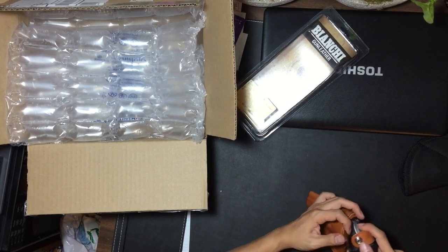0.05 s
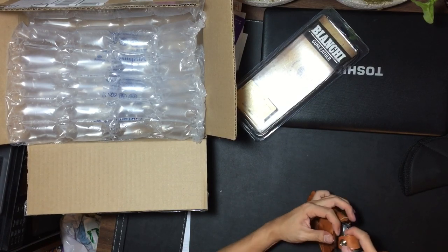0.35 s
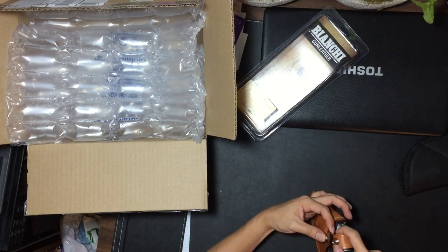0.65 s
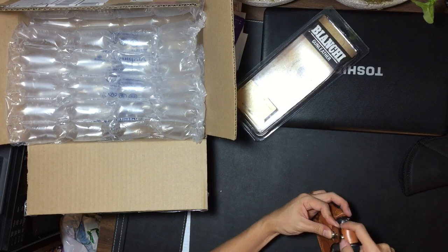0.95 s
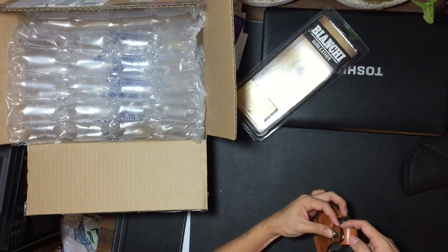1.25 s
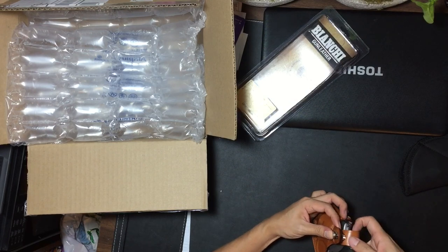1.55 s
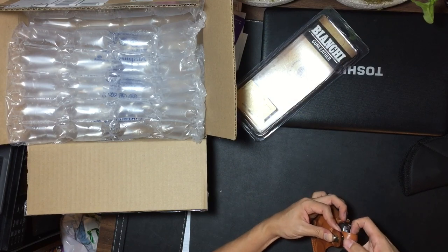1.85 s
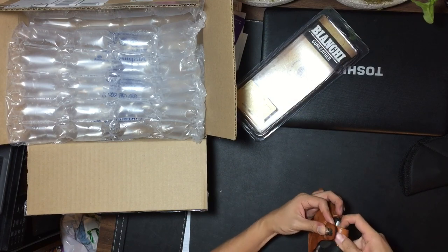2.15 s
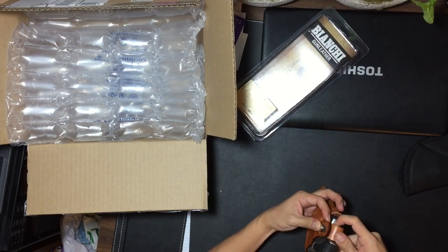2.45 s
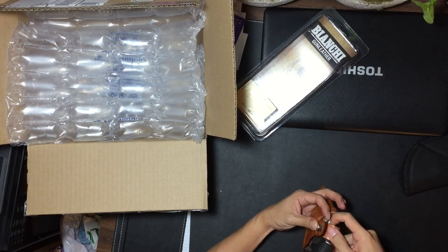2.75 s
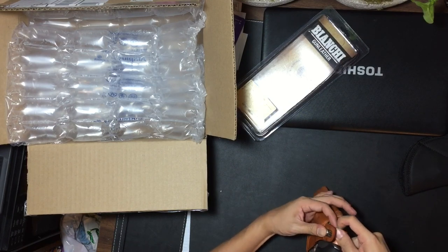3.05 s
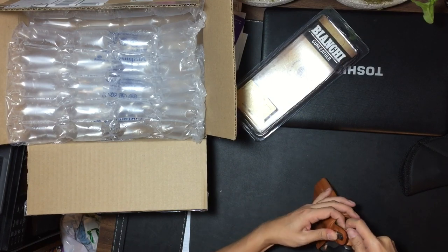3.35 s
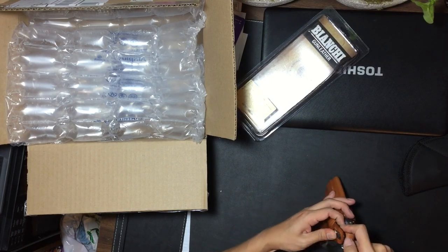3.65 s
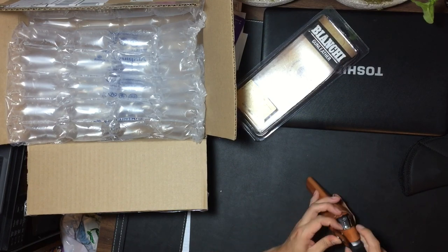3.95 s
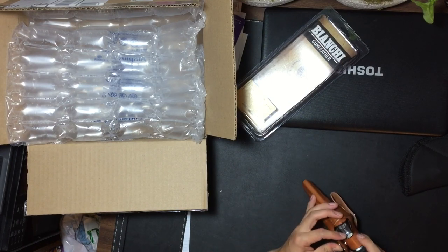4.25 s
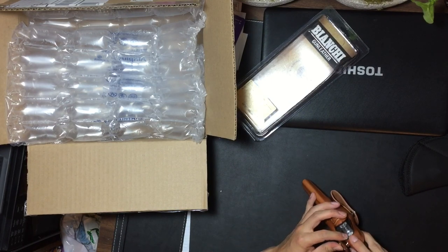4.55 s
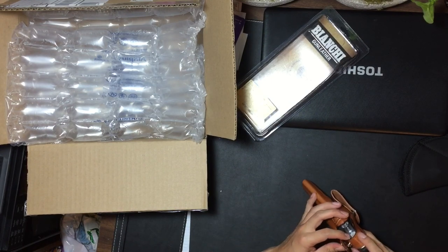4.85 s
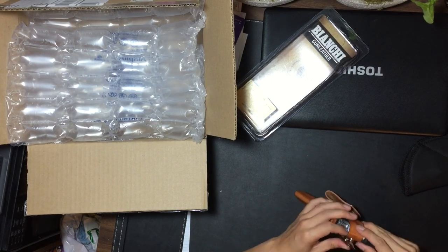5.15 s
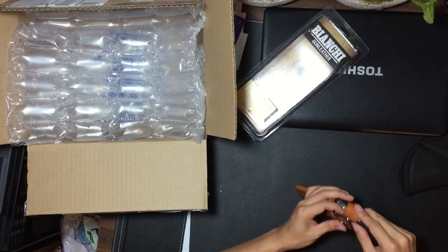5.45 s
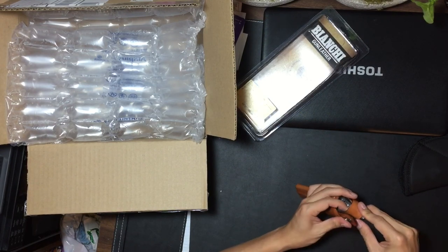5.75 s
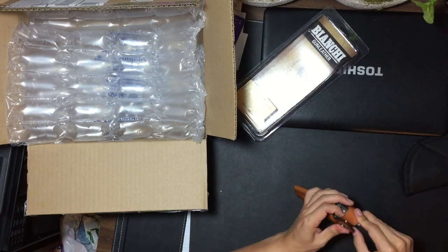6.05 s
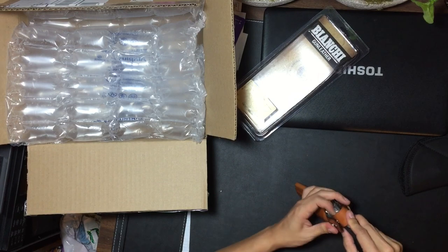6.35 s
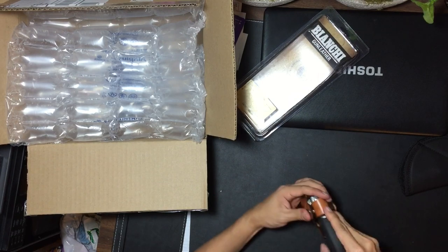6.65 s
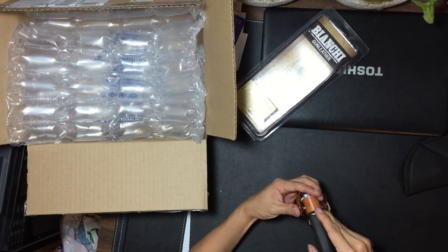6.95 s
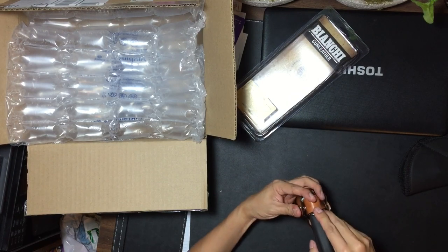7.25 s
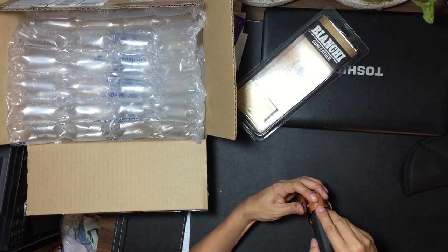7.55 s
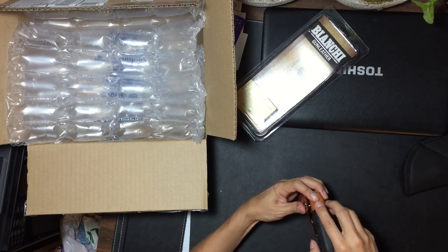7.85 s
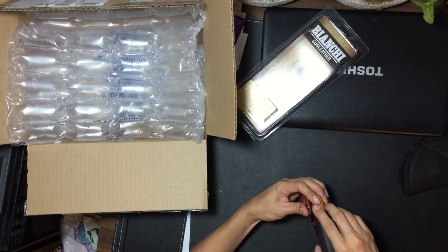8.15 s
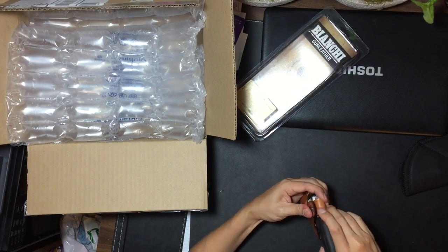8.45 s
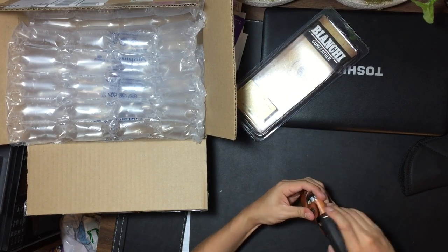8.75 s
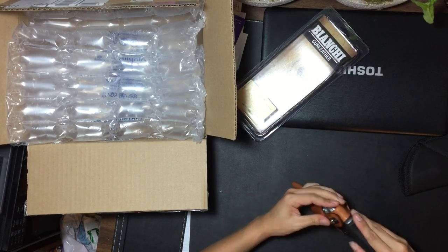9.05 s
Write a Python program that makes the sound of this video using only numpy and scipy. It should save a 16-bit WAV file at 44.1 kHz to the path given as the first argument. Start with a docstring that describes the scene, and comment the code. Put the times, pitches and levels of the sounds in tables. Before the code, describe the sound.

A revolver is worked into a stiff leather holster with small creaks, ticks and scuffs, then a press stud snaps shut.

```python
"""A revolver is worked into a stiff leather holster over a desk in a small, quiet room.
First hands rub and bump softly and the leather gives a few ticks. From about 3 s it sticks and slips
on the steel in creaking runs, each slip exciting the holster's resonances; at 4.4 s the gun scuffs
along the seam. From 7 s the strap is stretched, steel skids over the rim of its press stud, and at
8.7 s the stud snaps shut, jolting the holster in the hands."""
import sys
import numpy as np
from scipy import signal
from scipy.fft import rfft, irfft
from scipy.io import wavfile
from scipy.ndimage import uniform_filter1d

SR = 44100
rng = np.random.default_rng(int(sys.argv[2]) if len(sys.argv) > 2 else 0)


def master_out(mix):
    """Clip the mix to full scale and print it as 16-bit PCM to the path in sys.argv[1]."""
    frames = np.transpose(np.atleast_2d(mix))
    ceiling = np.clip(frames, -1, 1)
    pcm = np.round(ceiling * 32767).astype(np.int16)
    wavfile.write(sys.argv[1], SR, pcm)


N = 409688
SIZE, LEAD_S = 4096, 0.006  # samples in one contact sound; time allowed for creep before a slip


def amp(db):
    """Decibels to amplitude ratio."""
    return 10 ** (np.asarray(db) / 20)


def unit(x):
    """Normalisation to rms 1."""
    return x / np.sqrt(np.mean(x ** 2) + 1e-20)


def fade(t, t60):
    """Exponential decay, 60 dB in t60 seconds."""
    return np.exp(-np.log(1000) * t / t60)


def along(points, hz):
    """Interpolation of (frequency [Hz], value) points on a logarithmic frequency axis."""
    f, v = np.transpose(points)
    return np.interp(np.log(hz + 1), np.log(f + 1), v)


def add(track, s, sound):
    """Superposition of a sound on the track at time s."""
    part = track[max(round(s * SR), 0):][:len(sound)]
    part += sound[:len(part)]


def noise(spectrum, size):
    """Spectral shaping of white noise, at rms 1."""
    hz = np.fft.rfftfreq(size, 1 / SR)
    return unit(irfft(rfft(rng.standard_normal(size)) * amp(along(spectrum, hz)), size))


def causal(gain):
    """Minimum phase: the response with this gain that rings only after the blow."""
    cepstrum = irfft(np.log(np.maximum(gain, 1e-6)))
    cepstrum[1:SIZE // 2] *= 2
    cepstrum[SIZE // 2 + 1:] = 0
    return np.exp(rfft(cepstrum))


def even(force, grain):
    """Averaging: many tiny contacts sum to an even spectrum; grain (0-1) is the unevenness that stays."""
    return force * causal(uniform_filter1d(np.abs(force), size=15) ** (grain - 1))


# Spectrum of the room's air: (frequency [Hz], relative density [dB])
AIR_SPECTRUM = [(13, -49.5), (22, -25.5), (48, -3.5), (70, -1), (140, -12.5), (270, -16), (569, -20.5),
                (2320, -23.5), (2980, -24), (3510, -25), (4260, -27), (8970, -30.5), (10600, -34.5),
                (12500, -31.5), (16000, -37)]
def hush():
    """Stationary noise, strongest in the bass, is the room's noise floor."""
    return amp(-68.5) * noise(AIR_SPECTRUM, N)


# Decay of the room: (frequency [Hz], t60 [s])
ROOM_T60 = [(100, .5), (400, 0.27), (1200, 0.31), (3500, 0.35), (8000, .27), (15000, .23)]
# Colour of the echo: (frequency [Hz], relative gain [dB])
ECHO_COLOUR = [(100, -0.5), (400, -1.5), (1200, 4.5), (3500, -2), (8000, -1), (15000, -2)]
def room(x):
    """Diffuse reverberation: convolution with decaying noise, renewed every 0.1 s as the hands move."""
    out, hop = np.zeros(N), SR // 10
    for start in range(0, N, hop):
        block = x[start:start + hop]
        if block.any():
            hz, t, spectra = signal.stft(rng.standard_normal(SR // 2), SR, nperseg=256)
            decay = fade(t, along(ROOM_T60, hz)[:, None]) * (1 - fade(t, 0.0044))
            colour = amp(along(ECHO_COLOUR, hz))[:, None]
            tail = signal.istft(spectra * colour * decay, SR, nperseg=256)[1]
            add(out, start / SR + 0.003, signal.fftconvolve(block, tail / np.linalg.norm(tail)))
    return out


# Hollow swells under the handling: (peak time [s], level [dB], centre [Hz], 1/e half-width [s])
SWELLS = [(0.603, -64.5, 356, 0.041), (0.96, -73, 268, 0.085), (2.796, -65.5, 276, 0.059),
          (3.5, -68, 198, 0.078), (3.81, -60, 279.6, 0.052), (4.217, -71, 260, 0.048),
          (4.377, -67, 408, .06), (6.07, -68.5, 272, 0.056)]
def swells():
    """Narrow-band noise under a Gaussian envelope is heard as a soft, dull swell."""
    out, t = np.zeros(N), np.arange(SR // 2) / SR
    middle = t.mean()
    for s, db, hz, width in SWELLS:
        band = [(hz / 2, -50), (hz * 0.94, -18), (hz, 0), (hz * 1.065, -18), (hz * 2, -60), (hz * 4, -120)]
        envelope = np.exp(-((t - middle) / width) ** 2)
        add(out, s - middle, amp(db) * envelope * noise(band, len(t)))
    return out


# Bumps of hands and holster: (time [s], level [dB], frequency [Hz], t60 [s])
BUMPS = [(2.211, -58, 129, 0.086), (2.93, -58, 91, 0.28), (3.65, -60, 112, 0.19), (3.851, -56, 124, 0.11),
         (5.24, -42, 106, 0.19), (5.261, -40.5, 77.5, 0.12), (5.345, -50.5, 77.3, 0.42),
         (5.93, -54.5, 79.3, 0.78), (6.309, -51.5, 126, 0.11), (6.312, -53.5, 192, 0.12),
         (7.632, -60, 74, 1), (8.11, -49, 70, 0.11), (8.664, -40, 76.6, 0.33), (8.662, -40, 123, 0.14),
         (8.661, -44.5, 388, .07), (8.775, -45.5, 75, 0.28)]
def bumps():
    """Damped oscillation: each soft push excites one low mode."""
    out, t = np.zeros(N), np.arange(SR // 2) / SR
    attack = 1 - fade(t, 0.01)
    for s, db, hz, t60 in BUMPS:
        add(out, s, amp(db) * np.sin(2 * np.pi * hz * t) * fade(t, t60) * attack)
    return out


def gestures(rows):
    """Incoherent addition: the envelope of gestures that rise, fall and sum in power."""
    t = np.arange(N) / SR
    power = sum(amp(db - 20 * np.maximum((s - t) / rise, (t - s) / fall)) ** 2
                for s, db, rise, fall in rows)
    return np.sqrt(power)


# Shifts of the palms: (peak time [s], level [dB], 20 dB rise [s], 20 dB fall [s])
PALM_RUBS = [(0.73, -75, .08, .7), (2.27, -73.5, 0.92, 0.83), (2.78, -78, 0.4, 0.26),
             (3.88, -70.5, 0.72, 0.41), (4.34, -68, 0.055, 0.41), (5.25, -70, .06, .08),
             (5.43, -68.5, .04, 0.044), (5.79, -71.5, 0.038, 0.67), (6.21, -73, 0.46, 1),
             (7.68, -71, 0.41, 0.2)]
# Skin on leather: (frequency [Hz], relative density [dB])
PALM_SPECTRUM = [(60, -13.5), (170, -2.5), (280, -3), (400, -3), (600, -17), (1500, -41.5)]
def palms():
    """Friction of soft skin gives dull noise, faint while the hands only hold."""
    holding = amp(-80)
    jolt = (8.6723, -47, 0.012, 0.0602)  # one more rub, as the snap shakes the holster
    return np.hypot(holding, gestures(PALM_RUBS + [jolt])) * noise(PALM_SPECTRUM, N)


# Strokes of the gun: (peak time [s], level [dB], 20 dB rise [s], 20 dB fall [s])
DRAG_STROKES = [(2.94, -69, .45, 0.26), (3.33, -67.5, 0.34, 0.47), (3.574, -68.5, 0.087, 0.59),
                (4.357, -55.5, 0.054, 0.067), (5.84, -64.5, 0.1, 0.32), (6.608, -61, 0.064, .2),
                (6.85, -72, .2, 0.21), (7.35, -68.5, .02, .15), (7.594, -56.5, .075, 0.12),
                (8.65, -63.5, 0.25, 0.029)]
# Leather on steel: (frequency [Hz], relative density [dB])
DRAG_SPECTRUM = [(300, -23.5), (600, -4), (900, -6), (1250, 5.5), (1600, -7), (3000, -3), (4500, -14.5),
                 (7000, -13), (10500, -16.5), (16000, -22.5)]
def drag():
    """Sliding friction of the gun in the leather: noise with a fine grain of amplitude modulation."""
    grain_db = 2.5 * unit(uniform_filter1d(rng.standard_normal(N), size=200))
    return gestures(DRAG_STROKES) * unit(amp(grain_db) * noise(DRAG_SPECTRUM, N))


# Short skids: (peak time [s], level [dB], lead-in [s], t60 [s])
SCUFFS = [(4.359, -37.5, 0.0016, 0.026), (8.0673, -32.5, .0045, 0.03)]
# Their spectra, along the seam and over the stud's rim: (frequency [Hz], relative density [dB])
SEAM = [(150, -11), (400, -20), (750, -15), (1250, 4.5), (1800, -5), (3250, 3), (4600, -27), (6900, -7),
        (8000, -17), (10000, -22), (12500, -9), (15300, -1), (16000, -3.5)]
STUD_RIM = [(180, -37), (320, -9.5), (530, -28), (1100, -6), (1750, -13), (2400, -6.5), (3000, -8),
            (3700, 3), (4500, -3.5), (6000, -2.5), (7700, -7.5), (9000, -2.5), (10200, -9.5),
            (16000, -12.5)]
def scuffs():
    """Static friction yields to sliding: steel creeps, breaks loose and skids; noise follows speed."""
    out, hz = np.zeros(N), np.fft.rfftfreq(SIZE, 1 / SR)
    t = (np.arange(SIZE) - SIZE / 2) / SR
    creep = amp(-20.5) * fade(np.abs(t), t60=0.042)
    for (s, db, lead, t60), colour in zip(SCUFFS, [SEAM, STUD_RIM]):
        speed = np.clip(1 + t / lead, 0, 1) ** 0.56 * fade(np.maximum(t, 0), t60) + creep
        force = even(rfft(speed * rng.standard_normal(SIZE)), grain=0.4)
        skid = irfft(force * causal(amp(along(colour, hz))))
        add(out, s + t[0], amp(db) * np.linalg.norm(speed) * skid / np.linalg.norm(skid))
    return out


# The hollow, main, edge and fizz bands of a tick: (lower limit [Hz], upper limit [Hz])
BANDS = [(800, 1450), (1450, 4500), (4500, 10000), (10000, 16000)]
def contact(modes, bands_db, length, grain, detune, vary_db, loss_hz, knee_hz, floor_db, creep_db):
    """Modal excitation: a burst of tiny slips rings a body's resonances; bands_db sets each band's level."""
    hz, t = np.fft.rfftfreq(SIZE, 1 / SR), np.arange(SIZE) / SR - LEAD_S
    spots = rng.standard_normal((len(modes), 2))  # every slip catches at a new spot
    peaks = 0
    for (f, width, db), (higher, louder) in zip(modes, spots):
        offset = 2 * (hz - f * (1 + detune * higher)) / (width + loss_hz * f / 3000)
        peaks += amp(db + vary_db * louder) ** 2 / (1 + offset ** 2)
    floor = amp(floor_db) ** 2 / (1 + (hz / 9000) ** 2)
    radiation = hz ** 2 / (hz ** 2 + knee_hz ** 2)  # a small object radiates little bass
    body = np.sqrt(peaks / peaks.max() + floor) * radiation
    # the surfaces creep faintly before they let go; then the treble comes first, the hollow part later
    creep, after = amp(creep_db) * fade(np.abs(t), 0.03), np.maximum(t, 0)
    grit, treble = rng.standard_normal(SIZE), hz ** 4 / (hz ** 4 + 4500 ** 4)
    slow, fast = [rfft(grit * unit(creep + np.sqrt(after / life) * np.exp(-after / life)))
                  for life in (length, 0.8 * length)]
    force = even(slow * (1 - treble) + fast * treble, grain)
    for _ in range(2):  # bring each band to its level with a smooth tilt
        power = np.abs(force * body) ** 2 / SIZE / 200  # energy spread over 200 samples
        trim = [(np.sqrt(lo * hi), db - 10 * np.log10(power[(hz > lo) & (hz < hi)].sum()))
                for (lo, hi), db in zip(BANDS, bands_db)]
        body = body * amp(along(trim, hz))
    return irfft(force * causal(body))


def stray_slips(start=2.7, end=8.5, per_s=4):
    """A random point process: rows of faint slips while the leather is under strain."""
    chance = rng.random((round(per_s * (end - start)), 2))
    return [(start + (end - start) * when, -67.5 - 4 * softer, 0, 0) for when, softer in chance]


# Runs of slips: (start [s], length [s], mean gap [s], hurry [0-1], first level [dB], last level [dB],
# extra hollowness [dB], extra brightness [dB])
CREAKS = [(3.111, .0904, .045, .23, -54.5, -55.5, 10, 2.5),
          (3.263, .1089, .012, 0.53, -52.5, -51.5, -2.5, 3.5),
          (3.9183, .034, .017, 0.01, -55, -58, 0, -5.5), (5.7937, .0782, .0156, 0.24, -50, -55.5, 1, 0),
          (6.559, .028, .0093, 0.02, -59.5, -57.5, 10, 10.5), (6.6033, .0429, .0086, .1, -56, -59, 6, 6),
          (6.661, .0903, .015, .1, -50, -57, -2, -4.5), (7.6563, .0547, .018, .35, -46, -46, 2.5, 0),
          (8.422, .057, .028, 0.2, -71, -65.5, 9.5, -8)]
def creak_slips(scatter_s=0.0005, scatter_db=2.56):
    """Relaxation oscillation: rows of uneven slips that crowd together as the leather gives way."""
    rows = []
    for start, length, gap, hurry, first_db, last_db, hollow, bright in CREAKS:
        u = np.linspace(0, 1, round(length / gap) + 1)  # progress through the run
        late, louder = rng.standard_normal((len(u), 2)).T
        times = start + length * (u + hurry * u * (1 - u)) + scatter_s * late * (u > 0)
        levels = first_db + (last_db - first_db) * u + scatter_db * louder
        rows += [(s, db, hollow, bright) for s, db in zip(times, levels)]
    return rows


# The holster's modes as the gun fills it and the strap tightens:
# (frequency [Hz], width before added loss [Hz], relative level [dB])
LOOSE = [(1040, 50, 5), (1338, 110, 6), (1660, 170, -15), (2490, 130, 1), (3160, 100, -1.5),
         (3470, 37, -2.5), (6700, 500, -16)]
ENTERING = [(1600, 41, -2), (1980, 94, -1.5), (2350, 100, -11), (2720, 15, -19), (2780, 60, 0.5),
            (3390, 130, -4), (3920, 49, -24), (5220, 53, -16), (6330, 56, -19), (10300, 32, -33)]
SLIDING = [(1240, 140, -9.5), (2016, 110, 7.5), (2920, 350, 0.5), (3540, 280, -3.5), (4100, 200, -1.5),
           (6150, 780, -12), (9300, 900, -13)]
TURNED = [(1242, 34, -2), (2100, 170, -5), (2970, 250, 4.5), (3550, 100, 1), (4120, 150, 1.5),
          (5250, 180, -5), (6800, 350, -1), (7960, 490, -5), (9200, 690, 3.5), (12200, 1500, -7)]
SEATED = [(1183, 110, -6.5), (1800, 120, -5.5), (2240, 33, -1.5), (2800, 160, 0.5), (3050, 21, 0.5),
          (3510, 67, -3), (4310, 110, -8.5), (6090, 130, -12), (6940, 200, -8.5), (8350, 240, -11),
          (9500, 140, -8.5), (10100, 42, -21), (11270, 180, -9), (11500, 67, -24), (14300, 1500, -25)]
PULLED = [(1152, 99, 1), (1640, 40, -3), (2010, 19, 2.5), (2090, 65, -5), (2370, 65, 5), (2830, 180, 5.5),
          (3500, 73, 1.5), (4180, 110, -7.5), (5520, 84, -9), (7400, 160, -15.5), (9270, 120, -15),
          (11300, 92, -20), (11800, 35, -24)]
STRETCHED = [(1094, 72, 12.5), (2300, 140, -5.5), (2970, 240, -8), (3510, 59, -3), (4220, 62, -5),
             (5430, 200, -16), (6700, 170, -13), (8900, 190, -14), (11500, 66, -13), (12900, 98, -19),
             (14400, 64, -23)]
TAUT = [(1140, 87, 6.5), (2080, 37, -12), (3426, 28, -4), (3650, 35, -8), (4270, 41, -20), (5700, 59, -15),
        (6640, 110, -8), (7660, 76, -17), (8640, 120, -10), (10800, 55, -18), (12000, 110, -19),
        (12700, 100, -18), (13600, 120, -20), (14800, 100, -25)]
PRESSED = [(1080, 70, 7.5), (2110, 210, -11), (2460, 40, -9.5), (2970, 41, -6.5), (3500, 65, 0.5),
           (4290, 97, -17), (6240, 60, -16.5), (7780, 44, -19.5)]
# Grips, with bands relative to the main band:
# (start [s], modes, slip length [s], hollow [dB], edge [dB], fizz [dB])
GRIPS = [(0, LOOSE, .0029, -4, -15, -18), (3.05, ENTERING, 0.002, -27.5, -13, -28),
         (3.45, SLIDING, 0.0038, -17, -11.5, -18), (3.75, TURNED, 0.0036, -9, -2.5, -17.5),
         (5.7, SEATED, 0.0017, -1.5, -5.5, -23), (5.9, SEATED, 0.0019, -1.5, -7.5, -15),
         (6.3, PULLED, 0.0023, -6, -11.5, -14.5), (6.53, PULLED, 0.0029, -5.5, -9.5, -20.5),
         (7, STRETCHED, .0032, -9, -9.5, -15.5), (7.35, TAUT, 0.0028, -7, -8.5, -14),
         (8.4, PRESSED, 0.0026, -6.5, -15.5, -30)]
# Single slips: (time [s], main band level [dB], extra hollowness [dB], extra brightness [dB])
SLIPS = [(0.5624, -58, 3.5, 3), (1.414, -54, -1, 1.5), (1.4393, -54, -7, -5), (1.454, -58.5, 2.5, 1),
         (1.6058, -55, -4, -1.5), (2.1886, -58.5, 5.5, 3.5), (2.2689, -59, -2.5, 0.5), (2.732, -75, 5, 14),
         (2.8033, -67.5, 2.5, 1), (2.9317, -65, 4, 12.5), (2.9993, -59, -1.5, 6), (3.0793, -58, 8, -0.5),
         (3.1337, -50, 7, 6), (3.183, -50, -3, 2), (3.2456, -47, -2, -1), (3.4822, -50.5, 0, -0.5),
         (3.494, -52.5, -3, -3), (3.5168, -48.5, 2.5, -1), (3.5882, -55.5, -20, -2),
         (3.6342, -51, 1.5, 0.5), (3.797, -66.5, 4, 8), (3.818, -66, 10.5, -18), (4.1356, -67, -3, 6),
         (4.191, -68, 1, 7), (4.229, -59, -2.5, 2.5), (4.32, -57.5, 3, 1.5), (4.6145, -68, 3, -1),
         (4.831, -64.5, -5, -1), (4.862, -61.5, -6, 0), (4.921, -54, -2, 0.5), (5.289, -61.5, 4.5, -2.5),
         (5.368, -65, 9.5, -0.5), (5.55, -55.5, 2, 0), (5.9355, -44.5, -0.5, 1), (5.9744, -47, -1, 2.5),
         (6.0244, -46, -1.5, -1), (6.062, -56.5, -13.5, -1), (6.0991, -54.5, -6.5, -7),
         (6.266, -61, 5.5, 1.5), (6.3615, -52.5, 3, 5.5), (6.414, -55.5, -2, 5), (6.4826, -48.5, -5.5, 4),
         (6.546, -46, 3.5, 1.5), (6.769, -60, 1, 9), (6.815, -56, -4.5, -3), (6.883, -59.5, 1, 1),
         (7.0615, -44.5, -2.5, -0.5), (7.1116, -47, 0.5, -0.5), (7.1402, -50, 3, -3),
         (7.1702, -50, 0, -1.5), (7.255, -65, -1, 2), (7.301, -67.5, 3, 2), (7.438, -52.5, -2.5, 1.5),
         (7.464, -50.5, -1, -2), (7.4797, -54.5, 2, -2), (7.5172, -51.5, 1.5, -3), (7.5523, -48.5, 6, 0.5),
         (7.593, -47.5, 6, 2), (7.6274, -43, 2, -3), (8.365, -65, -0.5, 11.5), (8.556, -47, 0.5, -2.5),
         (8.5709, -52, 1.5, 8.5), (8.5969, -44, -5.5, -2.5)]
def leather():
    """Stick-slip friction: each slip on the steel rings the holster as it is gripped at that moment."""
    out = np.zeros(N)
    for s, db, hollower, brighter in SLIPS + creak_slips() + stray_slips():
        _, modes, length, hollow, edge, fizz = [grip for grip in GRIPS if grip[0] <= s][-1]
        bands_db = db + np.array([hollow + hollower, 0, edge + brighter, fizz + brighter])
        tick = contact(modes, bands_db, length, grain=0.54, detune=0.015, vary_db=2,
                       loss_hz=44.9, knee_hz=1000, floor_db=-28, creep_db=-24)
        add(out, s - LEAD_S, tick)
    return out


# The stud's modes: (frequency [Hz], width before added loss [Hz], relative level [dB])
STUD_MODES = [(940, 74, -3.5), (1055, 40, 3), (1255, 140, 1.5), (2180, 110, -5), (2820, 300, -3),
              (3636, 140, -1), (4054, 260, -13), (5380, 770, -13.5), (8140, 360, -7.5), (9300, 510, -6.5),
              (12340, 1300, -12.5), (15340, 900, -20.5)]
# The stud ticks on its socket, then rides over its spring, bottoms, and jolts the strap:
# (time [s], length [s], main band level [dB], relative hollow [dB], edge [dB], fizz [dB])
STUD_IMPACTS = [(7.8576, 0.00058, -62.5, -9, 4, 2.5), (8.6603, 0.00039, -25, -13.5, -0.5, -8.5),
                (8.6618, 0.00057, -23, -6.5, -8.5, -19), (8.6634, 0.0016, -31.5, 1, -7, -15)]
def snap():
    """Impact excitation: very brief contacts ring the press stud, which shuts with a hard click."""
    out = np.zeros(N)
    for s, length, db, hollow, edge, fizz in STUD_IMPACTS:
        bands_db = db + np.array([hollow, 0, edge, fizz])
        click = contact(STUD_MODES, bands_db, length, grain=0.2, detune=0.005, vary_db=-0.9,
                        loss_hz=70, knee_hz=650, floor_db=-29, creep_db=-46)
        add(out, s - LEAD_S, click)
    return out


def scene():
    """Superposition of the close, direct sounds, their reverberation and the room's hush."""
    ticks = leather()
    # the room's smooth, even echo of the snap and scuffs: four draws average away random spectral ripple
    steel_echo = sum(room(amp(-17.5) * snap() + amp(-16.5) * scuffs()) for _ in range(4))
    echo = amp(-10.5) * room(ticks) + steel_echo
    return (ticks + snap() + scuffs() + echo + bumps() + swells() + drag() + palms() + hush())[None]


def record(dry):
    """Band limiting removes rumble below 33 Hz and treble above 16 kHz."""
    dry = signal.sosfilt(signal.butter(4, 33, "highpass", fs=SR, output="sos"), dry)
    lowpass = signal.firwin(161, 16000, fs=SR, window="blackman")
    return signal.fftconvolve(dry, lowpass[None], mode="same", axes=1)


dry = scene()
out = record(dry)
master_out(out)
```